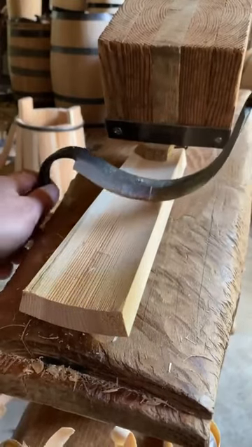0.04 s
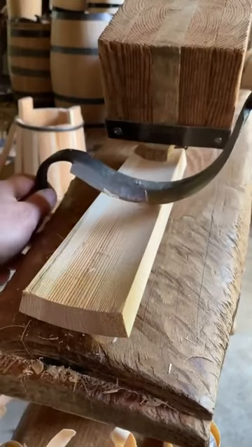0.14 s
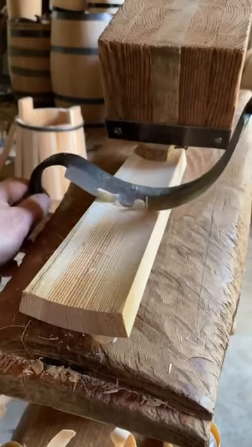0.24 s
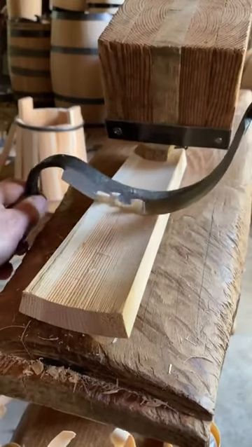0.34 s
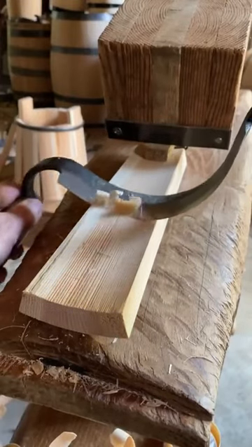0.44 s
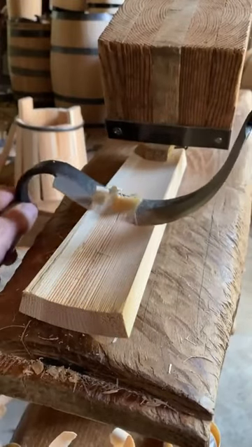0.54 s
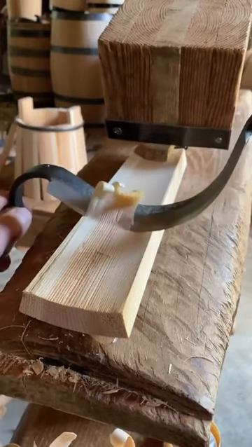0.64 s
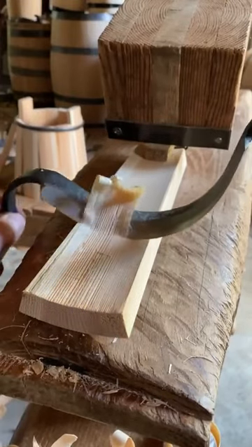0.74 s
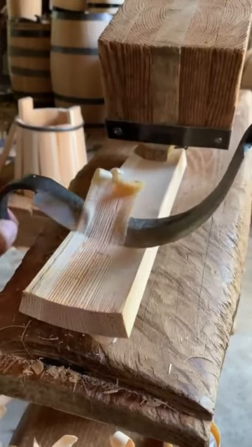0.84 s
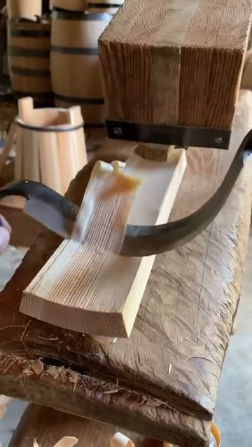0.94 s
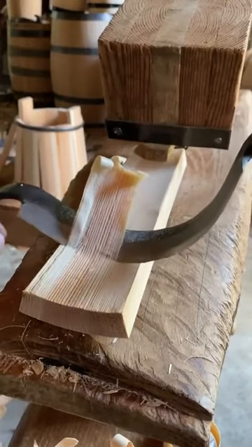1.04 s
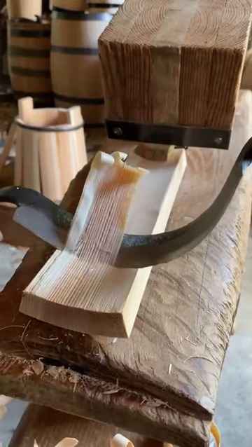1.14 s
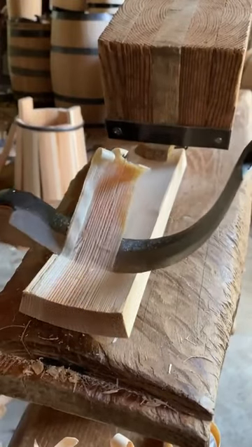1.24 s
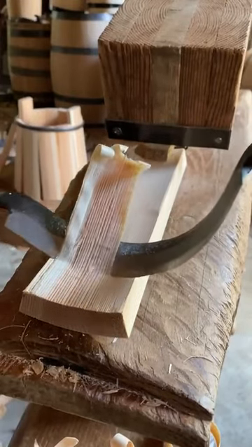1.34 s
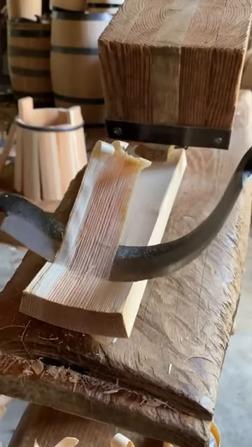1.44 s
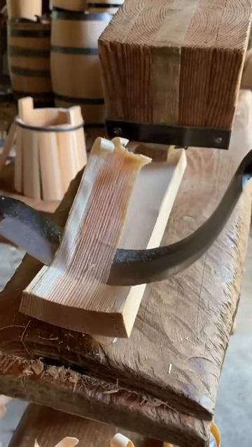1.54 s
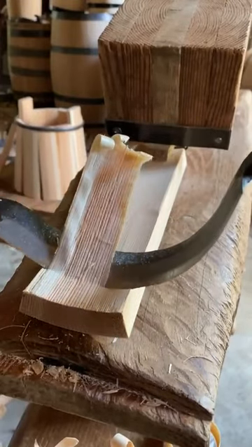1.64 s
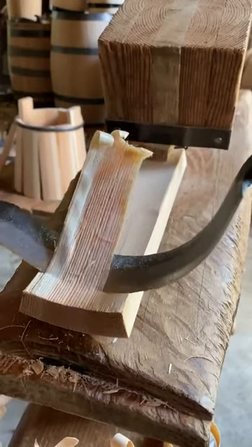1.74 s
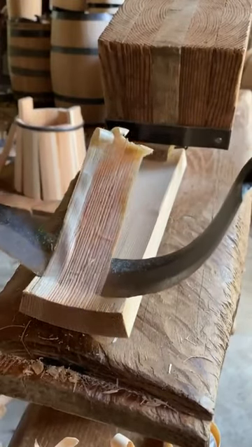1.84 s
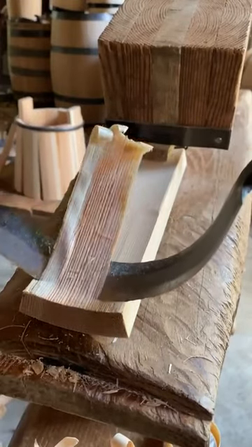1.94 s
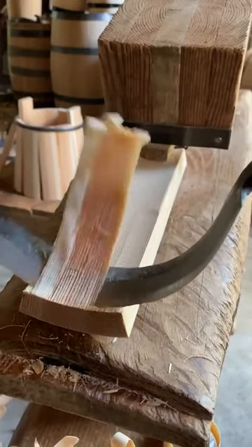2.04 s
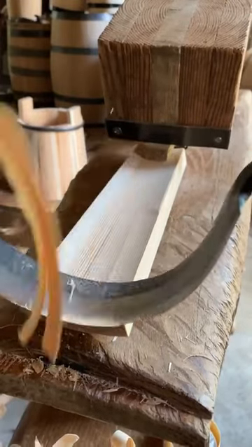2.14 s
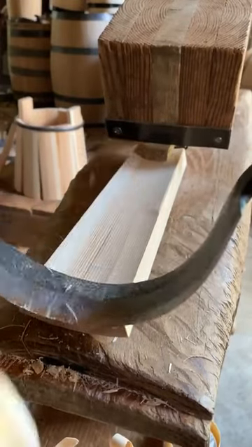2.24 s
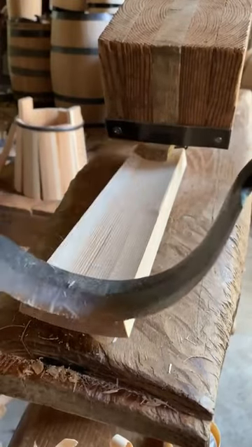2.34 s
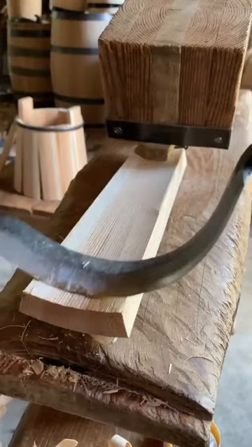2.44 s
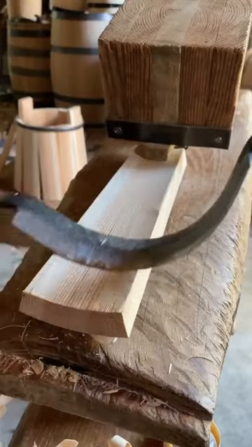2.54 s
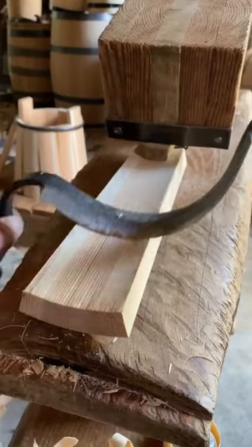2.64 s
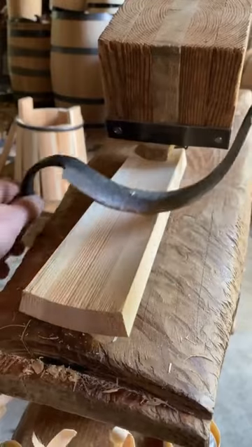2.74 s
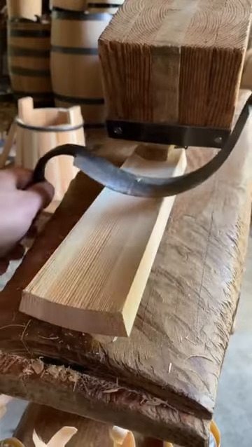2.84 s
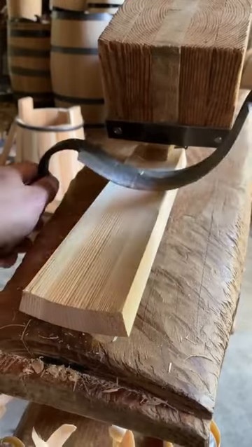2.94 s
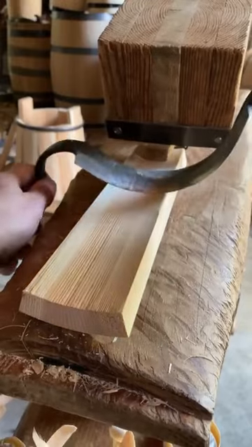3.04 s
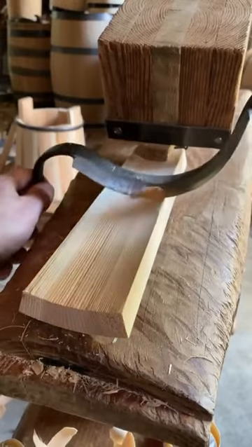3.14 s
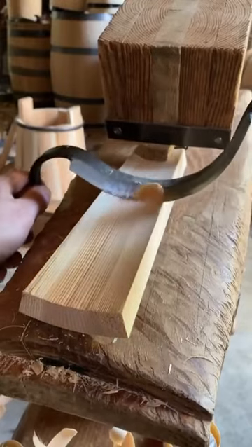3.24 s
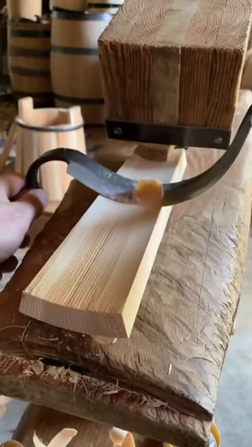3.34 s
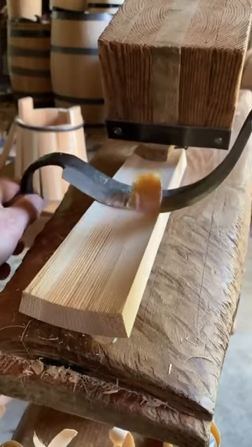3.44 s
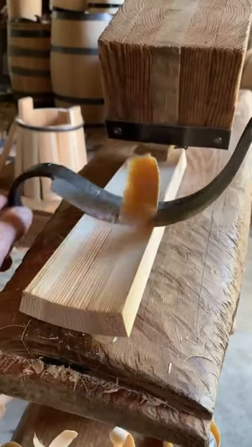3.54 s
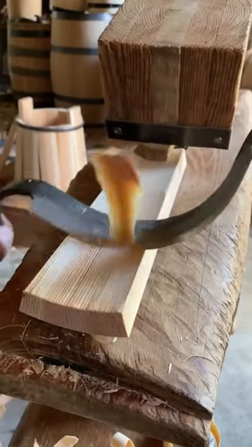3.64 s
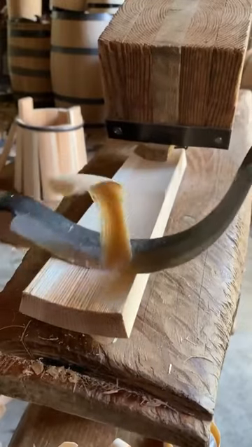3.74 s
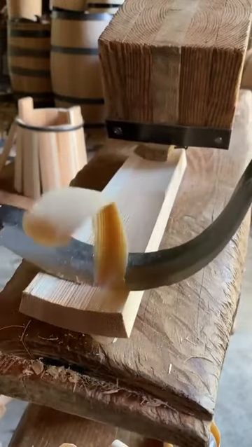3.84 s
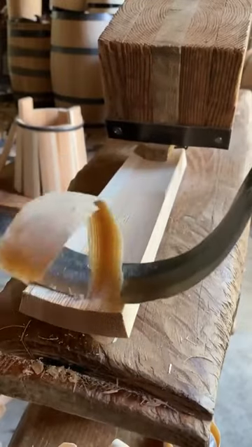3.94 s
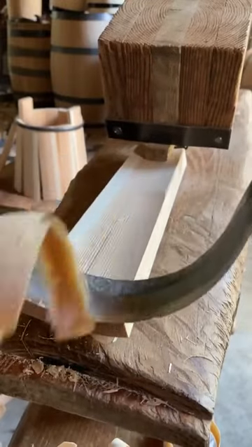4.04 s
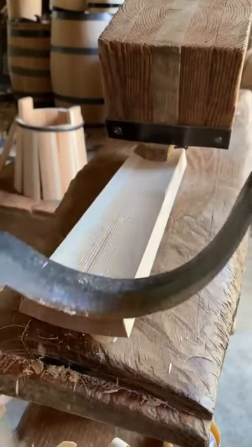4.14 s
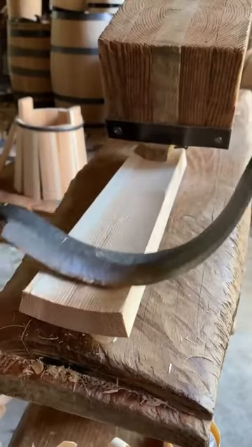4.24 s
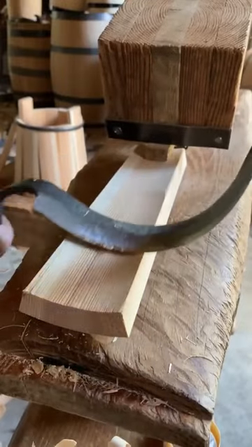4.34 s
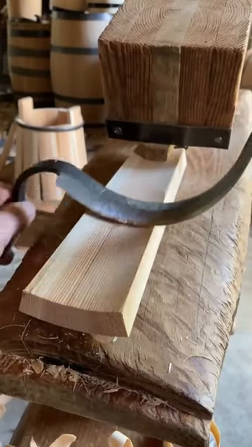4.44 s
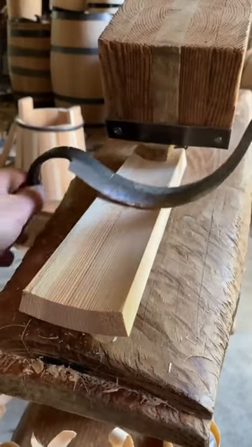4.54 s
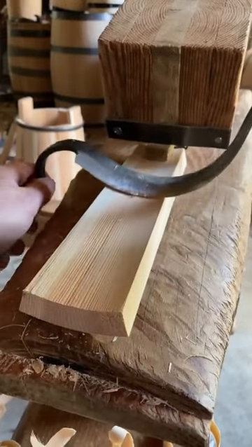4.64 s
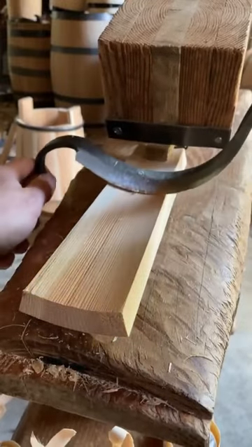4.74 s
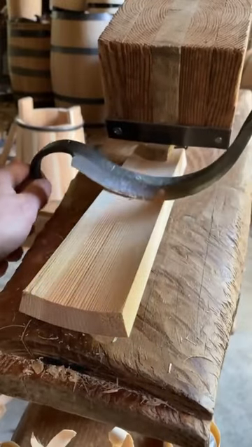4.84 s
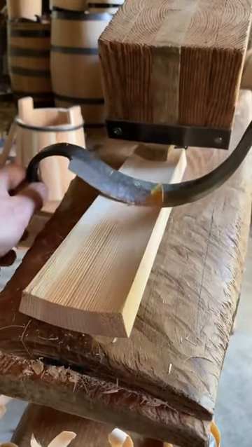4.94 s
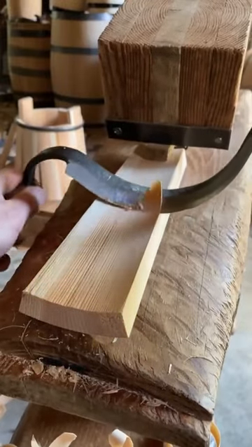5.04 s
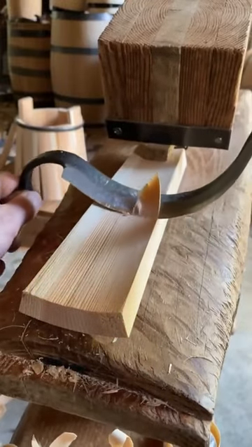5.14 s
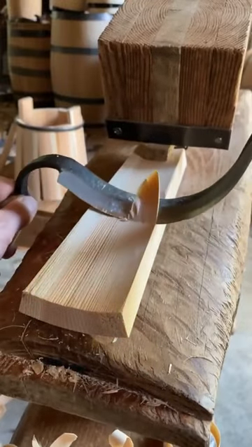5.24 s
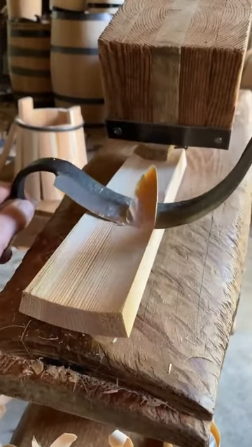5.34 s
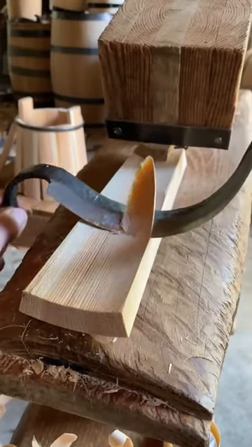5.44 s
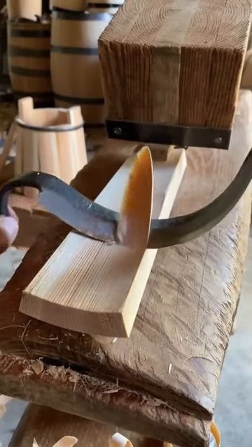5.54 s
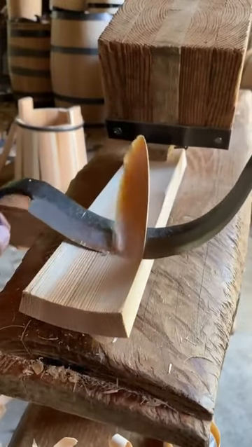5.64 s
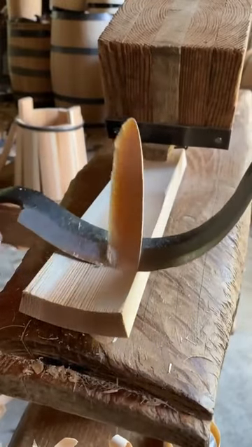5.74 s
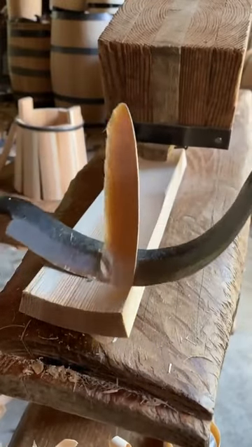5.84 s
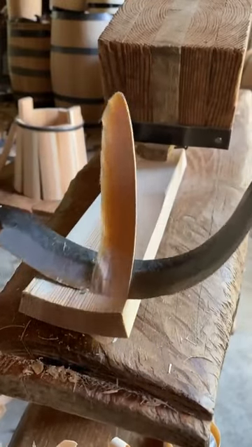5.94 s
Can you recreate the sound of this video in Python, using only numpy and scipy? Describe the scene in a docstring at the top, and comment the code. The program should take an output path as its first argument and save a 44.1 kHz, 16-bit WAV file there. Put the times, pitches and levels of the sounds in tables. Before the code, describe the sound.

A drawknife shaves a wooden board close to the microphone, in a workshop with a faint low rumble and little echo. After a light scrape and two clicks, the first pull runs from about 0.2 to 2.2 seconds: a dense, hissing crackle of fibres, faint ringing steel and a low thrum from the board. The shaving cracks repeatedly, its tone sinking, then tears off with the loudest snap at 2.2 seconds. From 2.4 to 2.9 seconds the blade taps, scrapes back and bumps the wood hollowly. A shorter, brighter pull starts at 3.1 seconds with a juddering groan and rips free at 4.1 seconds. Wooden knocks and a hollow sliding rub follow until 4.9 seconds. The third pull then crackles on until about 6 seconds, with sharper cracks around 5.4 and 5.9 seconds.

```python
"""Shaving a board with a drawknife

A curved drawknife is pulled three times along a softwood board clamped in a shaving horse (a bench),
close by in a workshop. The edge parts fibres in a dense crackle, the blade sings and the board thrums.
The shaving cracks as it bends and twice tears off. Between pulls the knife knocks and slides back."""
import sys
import numpy as np
from scipy import signal
from scipy.fft import rfft, irfft
from scipy.io import wavfile
from scipy.ndimage import map_coordinates

SR = 44100
rng = np.random.default_rng(int(sys.argv[2]) if len(sys.argv) > 2 else 0)


def generate_wav(signal):
    """Clip the signal to [-1, 1] and save it as 16-bit WAV at the path in sys.argv[1]."""
    frames = np.transpose(np.atleast_2d(signal))
    scaled = np.clip(frames, -1, 1) * 32767
    pcm = np.round(scaled).astype(np.int16)
    wavfile.write(sys.argv[1], SR, pcm)


N = 264159
TIME = np.arange(N) / SR
HZ = np.fft.rfftfreq(8192, 1 / SR)  # the frequencies at which filters are drawn


def amp(db):
    """Turns decibels into a gain."""
    return 10 ** (np.asarray(db) / 20)

def read(points, hz):
    """Joins (frequency, value) points into a curve on a logarithmic frequency axis."""
    f, value = np.transpose(points)
    return np.interp(np.log(hz + 1), np.log(f), value)

def evened(x):
    """Sets a sound's strength (rms) to 1. Row 0 is mid (what both ears share); row 1, side, is width."""
    return x / np.sqrt(np.mean(x[0] ** 2) + 1e-20)

def add(mix, s, sound):
    """Mixes a sound in at s seconds."""
    part = mix[:, max(round(s * SR), 0):][:, :sound.shape[1]]
    part += sound[:, :part.shape[1]]

def colour(x, db):
    """Filters a sound by one gain in dB for each of HZ; nothing rings ahead of its cause."""
    log_gain = np.log(amp(np.maximum(db, -100)))
    mirrored = np.concatenate([log_gain, log_gain[-2:0:-1]])
    response = np.exp(np.conj(signal.hilbert(mirrored)))
    taps = np.fft.ifft(response).real[:len(HZ)]
    return signal.oaconvolve(x, taps[None], axes=1)[:, :x.shape[1]]

def treble(x, corner_hz=7000):
    """Keeps only the highest part of a sound."""
    hz = np.fft.rfftfreq(x.shape[1], 1 / SR)
    return irfft(rfft(x) / (1 + (corner_hz / (hz + 1)) ** 10), x.shape[1])

def resonances(modes):
    """The filter curve in dB of an object's ringing notes; wider ones die sooner."""
    power = sum(amp(db) ** 2 / (1 + ((HZ ** 2 - hz ** 2) / (width * HZ + 1e-6)) ** 2)
                for hz, width, db in modes)
    return 10 * np.log10(power + 1e-12)

def resonate(x, hz, width):
    """Makes a sound ring at a moving pitch."""
    turn = np.exp(2j * np.pi * np.cumsum(hz) / SR)
    decay = np.exp(-np.pi * width / SR)
    return 2 * (turn * signal.lfilter([1 - decay], [1, -decay], x / turn)).real

def grains(per_s, spread_db, alike, size=N):
    """Tiny random breaks along the edge; with alike=1 they all come from one place."""
    sizes = amp(spread_db * np.minimum(rng.exponential(1, size), 4))
    clicks = sizes * rng.choice([-1, 1], size) * (rng.random(size) < per_s / SR)
    place = alike + np.sqrt(1 - alike ** 2) * rng.standard_normal(size)
    return np.array([clicks, clicks * place])

def splinter(decay_s, rise_s, alike):
    """One break: a rush of tiny clicks that swells and dies within milliseconds."""
    t = TIME[:len(HZ)]
    burst = grains(per_s=22000, spread_db=4, alike=alike, size=len(t))
    burst *= (1 - np.exp(-t / rise_s)) * np.exp(-t / decay_s)
    return burst / (np.linalg.norm(burst, axis=1, keepdims=True) + 1e-12)

def flutter(per_s, depth_db):
    """The edge grips unevenly: a factor near 1 that changes per_s times a second."""
    knots = rng.standard_normal(N)
    return amp(depth_db * np.interp(TIME * per_s, np.arange(N), knots))

def catches(per_s, size, decay_s):
    """A gain of 1 with brief random spikes."""
    spikes = size * np.minimum(rng.exponential(1, N), 3) * (rng.random(N) < per_s / SR)
    return 1 + signal.lfilter([1], [1, -np.exp(-1 / (decay_s * SR))], spikes)

def drift(x, depth_db, patch_s, patch_hz, sag_hz_per_s=0):
    """The tone wanders as the curl of wood changes shape, while the loudness stays the same."""
    hz, t, spectrum = signal.stft(x, SR, nperseg=512)
    knots = rng.standard_normal((200, 300))
    hz, t = np.meshgrid(hz, t, indexing="ij")
    position = [(hz + sag_hz_per_s * t) / patch_hz, t / patch_s]
    hills = map_coordinates(knots, position, order=3, mode="mirror")
    shaped = spectrum * amp(depth_db * np.minimum(hills, 1))
    loudness = np.linalg.norm(spectrum, axis=1, keepdims=True)
    shaped *= loudness / (np.linalg.norm(shaped, axis=1, keepdims=True) + 1e-20)
    return signal.istft(shaped, SR, nperseg=512)[1][:, :N]


# Tone of the workshop's background: f/Hz, level/dB. Levels in all tables are relative.
WORKSHOP_TONE = [(20, -7), (35, 1), (52, 9.5), (72, 9), (110, 1.5), (170, -6.5), (330, -5), (500, -15.5),
                 (1000, -17), (2000, -25), (3700, -22.5), (7000, -32.5), (9000, -51), (13000, -63.5)]
def workshop():
    """A steady low rumble under a faint hiss."""
    air = evened(colour(rng.standard_normal((2, N)), read(WORKSHOP_TONE, HZ)))
    side_db = read([(60, -32.5), (200, -17), (600, 5.5), (4000, -2)], HZ)
    return amp(-52) * np.array([air[0], colour(air[1:], side_db)[0]])

# How long the echo lasts: f/Hz, time to fade by 60 dB/s
ECHO_TIMES = [(100, 0.12), (1000, 0.28), (4000, 0.36), (8000, 0.21), (13000, 0.15)]
def room(x):
    """Scattered echoes of the room; each frequency dies at its own speed."""
    shape = (2, SR // 2)
    echoes = rng.choice([-1., 1.], shape) * (rng.random(shape) < 3000 / SR) * (TIME[:SR // 2] > .004)
    hz, t, spectrum = signal.stft(echoes, SR, nperseg=256)
    fade = amp(-60 * t / read(ECHO_TIMES, hz)[:, None])
    tail = signal.istft(spectrum * fade, SR, nperseg=256)[1]
    return signal.oaconvolve(x[:1], tail / np.linalg.norm(tail[0]), axes=1)[:, :N]

# The bench's low note: f/Hz, width/Hz, level/dB
BENCH_NOTE = [(67, 53, -3.5)]
# The hardest part of each pull: peak t/s, length/s, level/dB
SHUDDERS = [(0.752, 0.51, -49.5), (3.658, 0.54, -52.5), (5.67, 0.21, -44.5)]
def bench():
    """The heavy bench takes the strain of each pull with a low, dull shudder."""
    strain = sum(amp(db) * np.exp(-((TIME - s) / length) ** 2) for s, length, db in SHUDDERS)
    sharpened_db = 2 * resonances(BENCH_NOTE)
    rumble = evened(colour(grains(per_s=400, spread_db=1, alike=1), sharpened_db))[0]
    return np.array([strain * rumble, np.zeros(N)])

# Hollow notes of the knife lying on the board: f/Hz, width/Hz, level/dB
HOLLOW_NOTES = [(241.7, 28, -1), (373, 7.8, 3), (439, 14, -8.5), (639, 40, -16), (746, 27, -10.5),
                (846, 40, -18.5), (1300, 300, -30.5)]
# Tone of the dry scrape: f/Hz, level/dB
SCRAPE_TONE = [(300, -5.5), (1100, -5.5), (2000, -5.5), (2500, -4.5), (2950, -0.5), (3400, -9.5),
               (3900, -2), (5100, -11.5), (5700, -5.5), (7500, -13.5), (9000, -21), (13000, -26.5)]
# Each slide: peak t/s, rise/s, fall/s, rub level/dB, scrape level/dB
SLIDES = [(0.01, 0.086, 0.18, -56.5, -52), (2.45, 0.0025, 0.11, -57, -42.5),
          (2.838, 0.046, 0.085, -49.5, -52), (4.354, 0.0057, 0.016, -51, -46),
          (4.42, 0.036, 0.032, -50.5, -66.5), (4.533, 0.13, 0.14, -46, -59), (4.54, 0.01, 0.0091, -50, -54)]
def slides():
    """The flat of the blade is pushed back: a hollow rub and a light scrape swell and die away."""
    rub = evened(colour(grains(per_s=610, spread_db=-2.5, alike=.33), resonances(HOLLOW_NOTES)))
    scrape = colour(grains(per_s=2000, spread_db=-6, alike=.11), read(SCRAPE_TONE, HZ))
    scrape = drift(scrape, depth_db=2.5, patch_s=.08, patch_hz=180)
    scrape = evened(scrape) * catches(per_s=110, size=.55, decay_s=.005)
    out = np.zeros((2, N))
    for peak, rise, fall, rub_db, scrape_db in SLIDES:
        pressure = np.exp(-np.maximum((peak - TIME) / rise, (TIME - peak) / fall))
        out += pressure * (amp(rub_db) * rub + amp(scrape_db) * scrape)
    return out

# The flat of the knife bumps the board: t/s, level/dB
BUMPS = [(2.829, -27), (2.841, -21.5), (4.567, -25)]
def bumps(soft_hz=2000, damping=1.6):
    """A soft, gritty push rings the knife's hollow notes; pressed to the board, they die sooner."""
    out = np.zeros((2, N))
    ring_db = resonances([(hz, damping * width, db) for hz, width, db in HOLLOW_NOTES])
    ring_db -= 10 * np.log10(1 + (HZ / soft_hz) ** 2)
    for s, db in BUMPS:
        push = amp(-3) * splinter(decay_s=.008, rise_s=.001, alike=.3)
        push[0, 0] += 1
        ring = colour(push, ring_db)
        add(out, s, amp(db + 5) * ring / np.linalg.norm(ring[0]))
    return out

# Short woody knocks and rings: t/s, level/dB, centre f/Hz, width/Hz
KNOCKS = [(0.036, -27, 1920, 3550), (0.079, -26.5, 5030, 5030), (0.883, -23, 616, 730),
          (0.999, -22, 574, 696), (1.179, -13.5, 2720, 450), (2.1818, -25, 1680, 700),
          (2.188, -21, 1200, 450), (2.2168, -22.5, 1380, 500), (2.4467, -15.5, 1160, 260),
          (2.448, -26, 4450, 3500), (2.458, -17.5, 1480, 350), (2.458, -29, 4200, 3000),
          (2.527, -25, 3500, 1490), (2.545, -18, 3500, 900), (2.621, -28.5, 4530, 4000),
          (2.8256, -30, 620, 800), (4.122, -21, 206, 70), (4.1358, -27, 820, 400), (4.349, -24, 1200, 700),
          (4.3484, -23.5, 600, 200), (4.505, -12.5, 400, 60), (4.7902, -17, 2470, 1000),
          (4.7908, -26.5, 6100, 1400), (4.7934, -27, 2250, 2000), (4.8568, -21.5, 431, 107),
          (5.854, -26.5, 850, 398)]
def knocks():
    """A gritty click rings the wood: the knife tapping the board, or the body of a crack or tear."""
    out = np.zeros((2, N))
    tilt_db = read([(150, -9.5), (350, -15.5), (7000, -24.5), (10000, -32.5), (14000, -21)], HZ)
    for s, db, hz, width in KNOCKS:
        tone_db = resonances([(hz, width, 0)]) + tilt_db
        tone_db -= 10 * np.log10(1 + (HZ / (hz + 2.9 * width)) ** 4)  # a dull knock has no treble
        tone_db -= 10 * np.log10(1 + (.45 * hz / (HZ + 1)) ** 4)  # a sharp one has no bass
        jolt = amp(-5) * splinter(decay_s=.0025, rise_s=.0004, alike=.3)
        jolt[0, SR // 2000] += 1  # the click
        knock = colour(jolt, tone_db)
        add(out, s, amp(db + 6) * knock / np.linalg.norm(knock[0]))
    return out

# Low notes of board and bench: f/Hz, width/Hz, level/dB
BOARD_NOTES = [(65, 17, -9), (137, 8.4, -0.5), (187.2, 5.2, 7.5), (245.6, 19, -2), (336.6, 15.8, -1.5),
               (445, 11, -13), (610, 15, -15.5), (859, 48, -15.5)]
# The edge digs in and the board judders: t/s, length/s, extra chatter/dB
JUDDERS = [(0.27, 0.0084, 7), (0.306, 0.013, 12), (0.364, 0.03, 11), (0.646, 0.023, 11), (1.067, 0.028, 10),
           (3.223, 0.05, 15.5), (3.331, 0.02, 12.5), (3.374, 0.024, 11.5), (3.417, 0.021, 14),
           (3.521, 0.011, 12), (3.676, 0.021, 5.5), (4.933, 0.012, 8), (4.998, 0.03, 12.5),
           (5.064, 0.011, 13), (5.142, 0.01, 7.5)]
def board(age, contact, depth_db, pull, start_hz=230.5, settled_hz=203.5, settle_s=.27):
    """The edge chatters at a sinking pitch; its slips make the board groan, most early in a pull."""
    body_db = resonances(BOARD_NOTES) + read([(900, -12), (2000, -5)], HZ)
    body = evened(colour(grains(per_s=2000, spread_db=1.5, alike=1), body_db))[0]
    hz = settled_hz + (start_hz - settled_hz) * np.exp(-age / settle_s)
    phase = 2 * np.pi * np.cumsum(hz * flutter(per_s=90, depth_db=1)) / SR
    slips = np.sin(phase) + amp(-18) * np.sin(2 * phase)  # sudden slips add the octave
    chatter = np.sqrt(2) * slips * flutter(per_s=110, depth_db=2.4)
    judder = amp(sum(db * np.exp(-((TIME - s) / length) ** 2) for s, length, db in JUDDERS))
    push = contact * amp(pull["groan"] - pull["groan fade"] * age + .96 * depth_db)
    groan = push * flutter(per_s=32, depth_db=1.77) * (amp(-3) * body + amp(-6.5) * judder * chatter)
    side = colour(groan[None], read([(80, -25), (170, -12), (400, -13.5)], HZ))[0]  # from the left
    return np.array([groan, side])

# Ringing notes of the steel: f/Hz, width/Hz, level/dB
BLADE_NOTES = [(1744, 44, -8.5), (2047, 33, -0.5), (2250, 31, 4.5), (2293, 41, 5), (2830, 110, -7.5),
               (3540, 80, -13), (4074, 120, -7.5), (4660, 40, -13), (5840, 210, -7)]
def blade(age, contact, depth_db, pull):
    """The cut shakes the steel, while wood and hands damp its ringing."""
    ring = evened(colour(grains(per_s=2500, spread_db=.5, alike=.3), resonances(BLADE_NOTES)))
    return contact * amp(pull["ring"] - pull["ring fade"] * age + .99 * depth_db) * ring

# The first pull's long shaving rings lower as it grows: t/s, f/Hz, level/dB
SHAVING_GLIDE = [(.72, 7200, -48), (0.92, 5360, -34), (1.021, 4420, -40), (1.2, 3830, -47.5),
                 (1.4, 2730, -46), (1.55, 2700, -48.5), (1.8, 2540, -48.5), (2.0, 2340, -49),
                 (2.13, 1750, -59), (2.16, 1660, -41), (2.2, 1600, -61.5)]
# Its notes: multiple of the pitch, width/Hz, level/dB
SHAVING_NOTES = [(1, 487, 9.5), (1.206, 554, 5.5), (2.75, 696, 5.5)]
def shaving(grip):
    """Tiny breaks ring the stiff strip of wood that rises from the edge and sways."""
    breaks = grains(per_s=980, spread_db=0, alike=.21)
    times, pitches, levels = np.transpose(SHAVING_GLIDE)
    hz = np.interp(TIME, times, pitches) * flutter(per_s=25, depth_db=.35)
    ring = np.zeros((2, N))
    for multiple, width, db in SHAVING_NOTES:
        broad = resonate(breaks, multiple * hz, 2 * width)
        ring += amp(db) * resonate(broad, multiple * hz, 2 * width)
    outside_s = TIME - np.clip(TIME, times[0], times[-1])  # fades in before the glide and out after it
    level = amp(np.interp(TIME, times, levels)) * np.exp(-(outside_s / .12) ** 2)
    return level * evened(ring) * grip

# Tone of breaking wood: f/Hz, level/dB
CRACK_TONE = [(100, -19.5), (600, -24), (1300, -17.5), (2800, -9), (4200, -8.5), (5600, -4), (7800, -7.5),
              (9500, -12), (13000, -12)]
# The shaving cracks: t/s, level/dB, treble/dB
CRACKS = [(0.671, -24, -13), (0.784, -22, -14.5), (0.83, -21.5, -33), (0.8827, -13, -30), (1, -21.5, -11),
          (1.062, -26, -11), (1.0997, -20.5, -17), (1.117, -17.5, -20.5), (1.1605, -14, -17),
          (1.178, -12, -18), (1.342, -22, -24), (1.521, -20.5, -28), (1.6416, -22.5, -14),
          (1.688, -24, -21), (1.941, -23.5, -17), (2.1727, -8, -39), (2.1803, -2.5, -20.5),
          (2.1892, -4, -19), (2.2, -12.5, -25), (2.2156, -11, -29), (3.281, -25, -31), (3.583, -19, -29),
          (3.661, -17, -28), (3.908, -32, -17), (4.013, -21, -28), (4.054, -25.5, -15), (4.11, -23, -3),
          (4.1182, -8.5, -12), (4.134, -8.5, -19), (5.127, -32, -6.5), (5.1573, -23, -18),
          (5.1743, -21.5, -15), (5.192, -23, -15), (5.2253, -28, -11.5), (5.3, -25.5, -13.5),
          (5.3593, -23, -22), (5.374, -15, -31), (5.3938, -11.5, -24), (5.412, -29, -25),
          (5.5082, -22.5, -18), (5.547, -14, -22.5), (5.568, -31, -25), (5.601, -20, -16),
          (5.6211, -24, -15), (5.7383, -19.5, -14.5), (5.853, -11.5, -17), (5.98, -26, -13)]
# The last fibres give way: start t/s, peak t/s, end t/s, level/dB
TEARS = [(2.144, 2.206, 2.235, -23.5), (4.104, 4.119, 4.155, -22)]
def cracks():
    """The stiff shaving breaks across as it bends, and rips free at the end of the board."""
    out = np.zeros((2, N))
    for s, db, treble_db in CRACKS:
        first_break = splinter(decay_s=.0012, rise_s=.0009, alike=.4)
        smaller_fibres = amp(-3.5) * splinter(decay_s=.003, rise_s=.004, alike=.4)
        snap = colour(first_break + smaller_fibres, read(CRACK_TONE, HZ))
        top = treble(snap)
        add(out, s, amp(db + 19) * (snap - top + amp(treble_db + 16) * top))
    out = drift(out, depth_db=5, patch_s=.025, patch_hz=515)
    rip = evened(colour(grains(per_s=7100, spread_db=-7, alike=.5), read(CRACK_TONE, HZ)))
    for start, peak, end, db in TEARS:
        swell_db = np.interp(TIME, [start, peak, end], [-24, 0, -27])
        out += rip * amp(db + swell_db) * (TIME > start) * (TIME < end)
    return out

def stalls(depth_db, length_s, lag_s):
    """A crack takes the strain off the shaving, so the cutting sound sinks for a moment."""
    times = np.transpose(CRACKS)[0] + lag_s
    marks = np.zeros(N)
    marks[np.minimum(np.round(times * SR).astype(int), N - 1)] = 1
    dip = np.exp(-(np.arange(-2048, 2049) / (length_s * SR)) ** 2)
    return amp(depth_db * np.minimum(signal.oaconvolve(marks, dip, "same"), 1))

def crackle(contact, depth_db, pull, per_s=80, range_db=29.5):
    """Small splinters snap at random while the edge cuts, each with its own tone."""
    out = np.zeros((2, N))
    for when, weakness in rng.random((per_s * N // SR, 2)):
        snap = splinter(decay_s=.00098, rise_s=.0003, alike=.29)
        add(out, when * N / SR, amp(-range_db * weakness) * snap)
    out = drift(out, depth_db=6, patch_s=.012, patch_hz=1200)
    return contact * amp(pull["splinter"] + .79 * depth_db) * colour(out, read(CRACK_TONE, HZ))

# Tone of the parting fibres: f/Hz, level/dB
HISS_TONE = [(100, -14), (500, -9.5), (1300, -1.5), (1900, 5), (2600, 3), (3200, 6), (4400, 4), (5600, 5),
             (7600, 1), (9000, -8), (13000, -7.5)]
def fibres(grip, age, contact, depth_db, pull):
    """The edge parts thousands of fibres a second; now and then a bundle catches. Deeper is brighter."""
    hiss = colour(grains(per_s=6000, spread_db=1, alike=.083), read(HISS_TONE, HZ))
    hiss = drift(hiss, depth_db=11, patch_s=.09, patch_hz=190.14, sag_hz_per_s=301)  # the curl grows
    hiss = evened(hiss) * grip * catches(per_s=12, size=.9, decay_s=.00018)
    top = treble(hiss)
    dull_db = -20.5 * np.exp(-age / .34)  # dull until a shaving has lifted
    brightness = amp(pull["treble"] + depth_db + dull_db) * flutter(per_s=20, depth_db=5.5)
    return contact * amp(-45 + depth_db) * (hiss - top + brightness * top)

# The pulls: start t/s, end t/s, treble/dB, groan/dB, groan fade/(dB per s),
# blade ring/dB, ring fade/(dB per s), loudest splinter/dB
PULLS = [(0.17, 2.15, 1, -45, 6, -47, 5, -10), (3.114, 4.11, 7, -39.5, 7, -47, -3, -12),
         (4.882, 5.99, -2, -39.5, 3.5, -48, -3, -13)]
# How deep the edge cuts, one curve a pull: t/s, level above an ordinary cut/dB
CUT_DEPTHS = [
    [(0.22, -9), (0.26, -2.5), (0.37, 5), (0.44, 1.5), (0.58, 2.5), (0.7, 3.5), (0.81, 4.5), (0.87, 3.5),
     (0.93, 3.5), (1.15, 4), (1.36, -1), (1.6, 0.5), (1.74, -6), (1.8, 1), (1.87, -0.5), (1.925, -4),
     (2.02, 1.5), (2.07, -5), (2.13, -4)],
    [(3.2, -2), (3.46, -1.5), (3.56, 3.5), (3.72, 7), (3.82, 3.5), (3.93, 1), (3.98, 1.5), (4.08, -0.5)],
    [(4.96, 2), (5.16, 2.5), (5.35, -1.5), (5.62, 2), (5.82, 1), (5.88, 3), (5.99, 2.5)],
]
def pulling(bite_s=.058, release_s=.013):
    """For each moment: seconds into the pull, edge contact (0-1), depth of cut and the pull's settings."""
    rows = np.array(PULLS)
    current = np.maximum(np.searchsorted(rows[:, 0], TIME) - 1, 0)
    start, end, *settings = rows[current].T
    age = np.maximum(TIME - start, 0)
    bite = np.minimum(age / bite_s, 1) ** 2
    release = np.exp(-(np.maximum(TIME - end, 0) / release_s) ** 2)
    depth_db = np.interp(TIME, *np.concatenate(CUT_DEPTHS).T)
    names = ["treble", "groan", "groan fade", "ring", "ring fade", "splinter"]
    return age, bite * release, depth_db, dict(zip(names, settings))

# Stereo width of close sounds: f/Hz, side level/dB
STEREO_WIDTH = [(100, -23), (700, -2.5), (1300, -14.5), (2200, -13.5), (3100, 1.5), (4200, -3), (5500, 0),
                (7500, 4.5), (10000, 14.5), (13000, 3.5)]
def widen(x, width_db):
    """Close treble reaches the microphone's two openings out of step, so it sounds wide."""
    side = colour(x[1:], read(STEREO_WIDTH, HZ) + width_db)[0]
    return np.array([x[0], -signal.hilbert(side).imag])

def scene():
    """Mixes all the sources as mid and side, then turns them into left and right."""
    age, contact, depth_db, pull = pulling()
    dips = stalls(depth_db=-4, length_s=.009, lag_s=.003)
    grip = dips * flutter(per_s=110, depth_db=2)
    paring = fibres(grip, age, contact, depth_db, pull) + shaving(grip)
    paring += dips * blade(age, contact, depth_db, pull)
    breaking = cracks() + crackle(contact, depth_db, pull)
    cutting = widen(paring, width_db=1.1) + widen(breaking, width_db=1.5)
    clatter = widen(knocks() + bumps() + slides(), width_db=2.5)
    thrum = board(age, contact, depth_db, pull) + bench()
    echoes = room(amp(-15) * cutting + amp(-11.5) * clatter + amp(-24) * thrum)
    mid, side = cutting + clatter + thrum + workshop() + echoes
    return np.array([mid + side, mid - side])

# Overall tone of the whole sound: f/Hz, level/dB
OVERALL_TONE = [(15, -36), (30, -19), (48, 1), (9000, -2.5), (10900, -7), (12000, -4), (12900, 4),
                (13400, -21), (15000, -64.5)]
def record(dry, top_hz=14000):
    """The deep bass is thinned and the top treble is cut off."""
    heard = colour(dry, read(OVERALL_TONE, HZ))
    low_pass = signal.firwin(255, top_hz, window=("kaiser", 9), fs=SR)
    return signal.oaconvolve(heard, low_pass[None], "same")


dry = scene()
out = record(dry)
generate_wav(out)
```